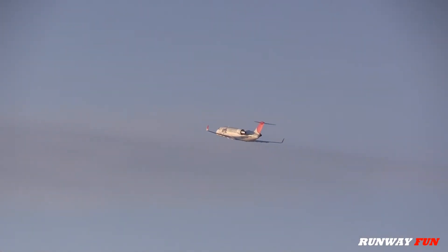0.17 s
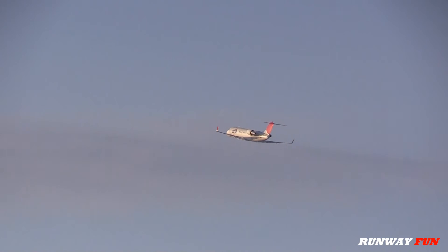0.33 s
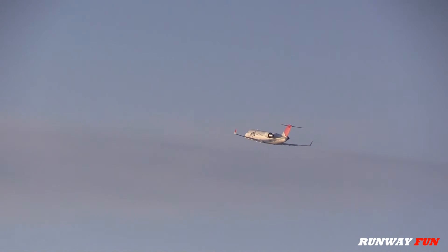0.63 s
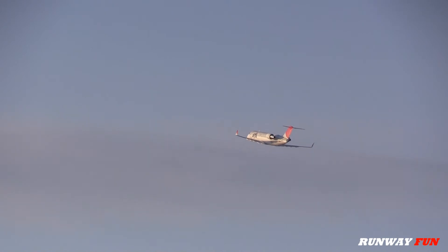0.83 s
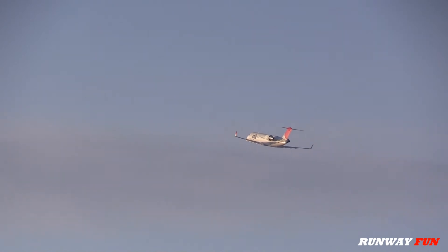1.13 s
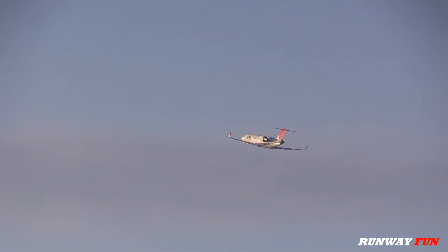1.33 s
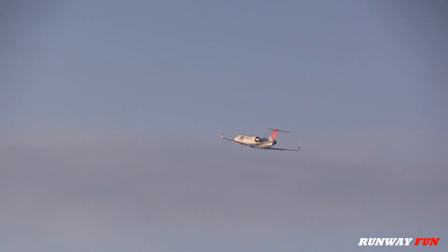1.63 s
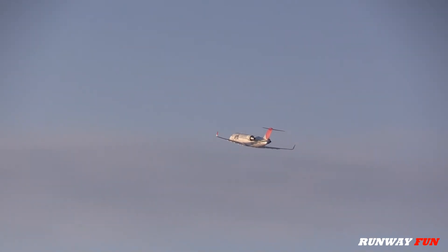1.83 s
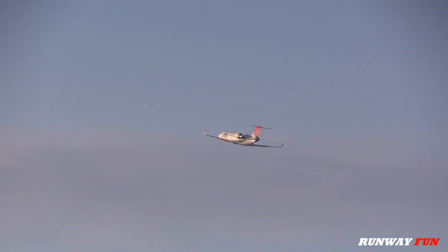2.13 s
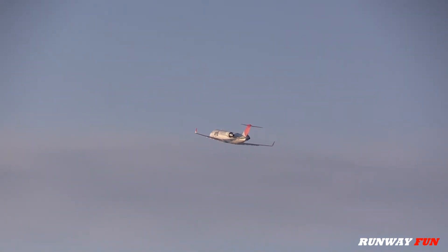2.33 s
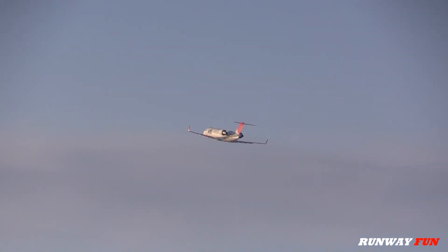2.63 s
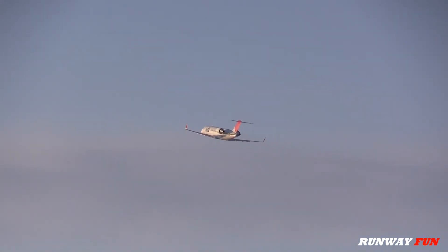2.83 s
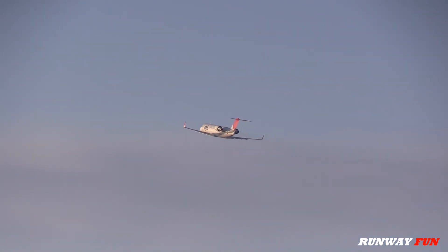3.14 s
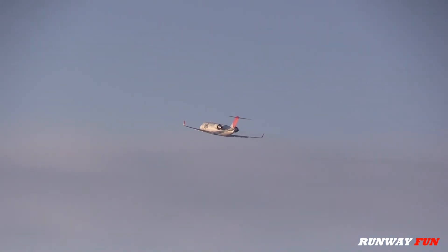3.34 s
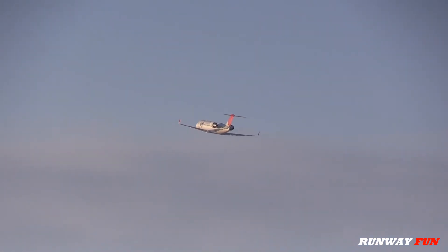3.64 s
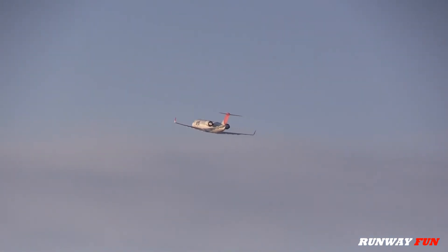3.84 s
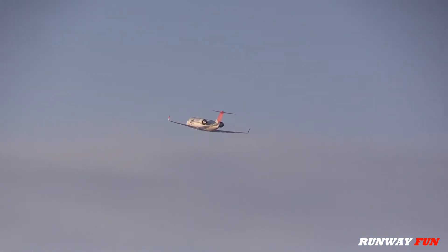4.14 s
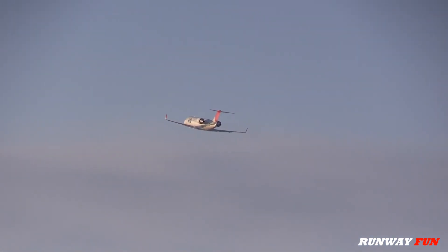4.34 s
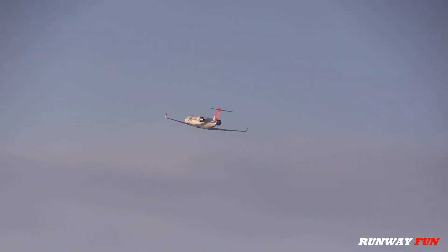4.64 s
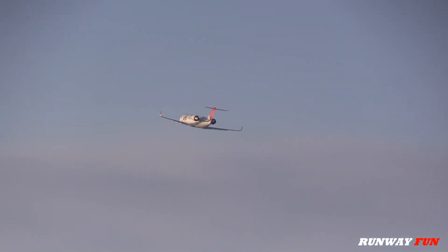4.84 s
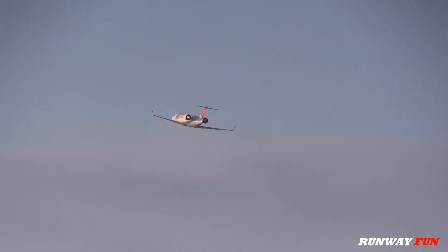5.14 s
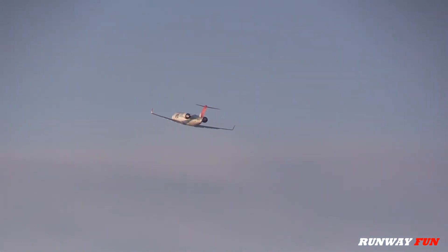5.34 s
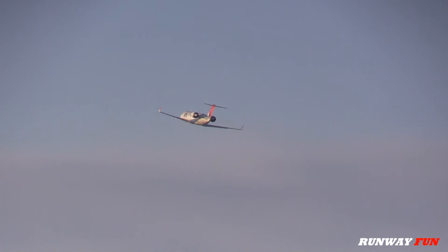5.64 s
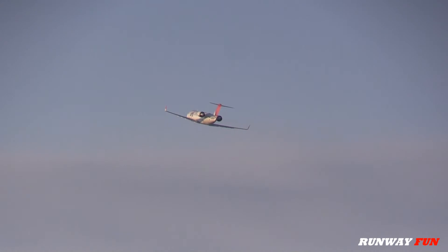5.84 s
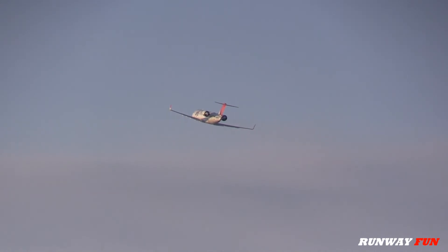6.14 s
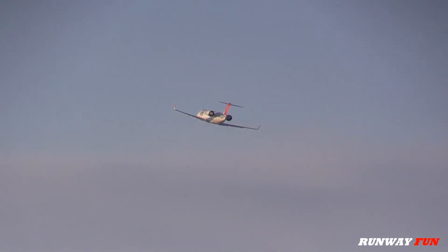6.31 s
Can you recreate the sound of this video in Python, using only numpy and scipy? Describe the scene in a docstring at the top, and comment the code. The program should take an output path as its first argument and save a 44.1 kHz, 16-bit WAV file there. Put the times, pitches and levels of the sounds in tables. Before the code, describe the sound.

Distant rumble of a small departing jet gradually weakens and dulls, with a faint buzz, thin hiss and occasional soft plastic clicks close by.

```python
"""A small twin jet climbs away, heard from far off beside a camera on a tripod.
From the start the turbulent exhaust roars, wavering in the air; the fans add a faint buzz and whine,
and close by the camera's motor hums in a thin hiss. From 0.2 s to just after 5 s its controls click
now and then, ringing the housing. The whine flares twice in the first two seconds, the buzz fades
and returns around the middle, and by the end the receding roar is weaker and duller."""
import sys
import numpy as np
from scipy import signal
from scipy.fft import rfft, irfft
from scipy.io import wavfile

SR = 44100
rng = np.random.default_rng(int(sys.argv[2]) if len(sys.argv) > 2 else 0)


def int16_out(signal):
    """Quantize to a 16-bit WAV file."""
    q = np.round(np.clip(np.atleast_2d(signal).T, -1, 1) * 32767)
    wavfile.write(sys.argv[1], SR, q.astype(np.int16))


N = 285327
TIME = np.arange(N) / SR
FREQ = np.maximum(np.fft.rfftfreq(N, 1 / SR), 1)
OPPOSED = np.array([[1], [-1]])  # antiphase between left and right

# exhaust roar: (frequency [Hz], relative spectral density [dB])
ROAR_SPECTRUM = [(20, -47), (42, -13), (55, -19.5), (68, -2.5), (90, -6), (106, 2.5), (165, 1), (200, -5.5),
                 (290, -7.5), (400, -13.5), (540, -17), (760, -22.5), (1300, -36.5), (1850, -49.5),
                 (2550, -62.5), (6000, -85.5)]
# share of the roar scattered by the surroundings: (frequency [Hz], side minus mid level [dB])
ROAR_SCATTER = [(30, -19), (70, -31), (140, -27), (280, -15), (480, -10), (900, -3), (2500, -5.5)]
# the roar swells or sinks: (centre time [s], duration [s], rumble gain [dB], rush gain [dB])
ROAR_SWELLS = [(-0.013, 0.14, 10, 1.5), (1.733, 0.57, -3.5, -2.5), (2.427, 0.47, 0, -0.5),
               (2.802, 2.4, 0, -2), (3.485, 0.13, 8, -0.5), (4.675, 0.13, 7, -2), (4.948, 0.53, -2.5, 1),
               (6.147, 0.54, 3, 0.5)]
# buzz of the fans' uneven blade shocks:
# (shaft harmonic [number], engine [-1 or 1], level from beside [dB], level from behind [dB])
BUZZ_HARMONICS = [(4, 1, -14, -7.5), (5, -1, -1.5, -8), (6, 1, -6.5, -6.5), (7, -1, -4.5, -4.5),
                  (8, 1, -12.5, -5), (9, 1, -11.5, -12), (10, 1, -25, -20.5), (11, 1, -12.5, -18),
                  (12, 1, -18, -17.5)]
# the buzz fades for a while: (centre time [s], duration [s], gain [dB])
BUZZ_DIPS = [(3.345, 2.8, -5)]
# the whine flares up: (start time [s], duration [s], gain [dB])
WHINE_BOOSTS = [(.56, .33, 9.5), (1.26, 0.48, 7)]
# hum of the camera's motor: (frequency [Hz], level [dB])
MOTOR_TONES = [(574.3, -51), (587.7, -55.5), (1148.6, -72)]
# microphone hiss: (frequency [Hz], relative spectral density [dB])
HISS_SPECTRUM = [(200, 2), (3000, 2), (5000, 1), (8000, -.3), (12000, -1.3), (15500, -1.3)]
# clicks of the camera's controls: (time [s], level [dB], contact softness [0-1])
CONTROL_CLICKS = [(0.1898, -41.5, .1), (0.8885, -42.5, .4), (1.0675, -51, .6), (1.2411, -43.5, .35),
                  (2.3028, -41.5, .1), (3.7812, -40.5, .05), (4.7697, -59, .4), (5.124, -43, .1)]
# normal modes of the plastic housing: (frequency [Hz], level [dB], 60 dB decay time [s])
HOUSING_MODES = [(1280, -2, .06), (1660, -6, .06), (1830, -8, .06), (2070, -11, .075), (2133, -6, .075),
                 (2182, -10, .08), (2330, -16, .06), (2490, -15, .06), (2600, -14, .06), (2940, -13, .06),
                 (3350, -17, .06), (3850, -20, .06), (4420, -11, .04), (4790, -16, .04), (4930, -16, .04),
                 (5140, -12, .04), (7140, -24, .06)]
# its dense weaker modes: (frequency [Hz], relative spectral density [dB])
CRACK_SPECTRUM = [(500, -15), (1200, 0), (2100, -8), (3500, -17), (4800, -9), (5800, -16), (7200, -14),
                  (9000, -19), (12000, -19), (15500, -27)]


def undb(db):
    """Amplitude ratio of a level in decibels."""
    return 10 ** (np.asarray(db) / 20)


def unit(x):
    """Normalisation to rms 1."""
    return x / np.sqrt(np.mean(x ** 2))


def colour(points):
    """Spectral envelope: gain interpolated over log frequency from (Hz, dB) points."""
    hz, db = np.transpose(points)
    return undb(np.interp(np.log(FREQ), np.log(hz), db))


def noise(gain):
    """Linear filtering: white noise weighted by a gain at every frequency."""
    return irfft(rfft(rng.standard_normal(N)) * gain, N)


def walk(rate_hz):
    """Low-pass random fluctuation of rms 1 with a bandwidth of about rate_hz."""
    return unit(noise(np.exp(-(np.fft.rfftfreq(N, 1 / SR) / rate_hz) ** 2)))


def swell(centre, duration):
    """Raised-cosine envelope, from 0 to 1 and back."""
    return np.cos(np.pi * np.clip((TIME - centre) / duration, -.5, .5)) ** 2


def flare(start, duration, edge_s=0.033):
    """Trapezoidal envelope: quick attack, hold, quick release."""
    return np.clip(np.minimum(TIME - start, start + duration - TIME) / edge_s, 0, 1)


def flight(speed_m_s=75, nearest_m=301.2, past_nearest_m=477.4):
    """Spherical spreading along a straight path: gain in dB since the start, and the jet's aspect."""
    along = past_nearest_m + speed_m_s * TIME
    distance = np.hypot(along, nearest_m)
    spreading_db = 20 * np.log10(distance[0] / distance)
    cosine = along / distance
    behind = (cosine - cosine[0]) / (cosine[-1] - cosine[0])  # 0 "beside" at first, 1 "behind" at last
    return spreading_db, behind


def roar_levels(spreading_db, behind):
    """Directivity: the exhaust throws its lows backwards; rumble and rush also swell on their own."""
    roar_db = np.interp(behind, (0, 1), (-23.5, -25.5)) + spreading_db
    rumble_db = np.interp(behind, (0, 1), (-3.5, -0.7))
    rush_db = np.interp(behind, (0, 1), (2.5, -0.8))
    for centre, duration, deep_db, high_db in ROAR_SWELLS:
        rumble_db += deep_db * swell(centre, duration)
        rush_db += high_db * swell(centre, duration)
    return roar_db, rumble_db, rush_db


def exhaust_roar(roar_db, rumble_db, rush_db, waver_db=0.54, rumble_hz=170, rush_hz=750):
    """Turbulent mixing radiates broadband noise; each half octave wavers on its way through the air."""
    shape = colour(ROAR_SPECTRUM)
    direct = noise(shape)
    scattered = noise(shape * colour(ROAR_SCATTER))
    spectrum = rfft(unit(direct + OPPOSED * scattered))
    half_octaves = 2 * np.log2(FREQ)
    roar = 0
    for band in range(8, 26):
        hz = 2 ** (band / 2)
        rumble_share = 1 / (1 + (hz / rumble_hz) ** 6)
        rush_share = 1 / (1 + (rush_hz / hz) ** 4)
        db = roar_db + rumble_share * rumble_db + rush_share * rush_db + waver_db * walk(rate_hz=8)
        triangle = np.maximum(1 - abs(half_octaves - band), 0)
        roar += undb(db) * irfft(spectrum * triangle, N)
    return roar


def far_tone(hz, scatter=0.66, fade_hz=6, width=0.36):
    """Multipath interference: a steady tone adds to copies scattered by turbulent air, and wavers."""
    steady = np.exp(2j * np.pi * rng.random())
    scattered = scatter * (walk(fade_hz) + 1j * walk(fade_hz))
    side = width * OPPOSED * walk(fade_hz)
    carrier = np.exp(2j * np.pi * np.cumsum(hz) / SR)
    return unit(np.real((steady + scattered + side) * carrier))


def fan_buzz(shaft_hz, detune_hz, spreading_db, behind, level_db=-41.5):
    """Uneven blade shocks repeat each turn, giving harmonics of two slightly different shaft rates."""
    dip_db = sum(db * swell(centre, duration) for centre, duration, db in BUZZ_DIPS)
    buzz = 0
    for harmonic, engine, beside_db, behind_db in BUZZ_HARMONICS:
        directivity_db = beside_db + behind * (behind_db - beside_db)
        buzz += undb(directivity_db) * far_tone(harmonic * (shaft_hz + engine * detune_hz))
    return undb(level_db + spreading_db + dip_db) * buzz


def fan_whine(shaft_hz, spreading_db, behind, blades=28, level_db=-80.5, shadow_db=-8):
    """One fan radiates its blade-passing frequency, shadowed from behind; the tone flares twice."""
    flare_db = sum(db * flare(start, duration) for start, duration, db in WHINE_BOOSTS)
    whine = far_tone(blades * shaft_hz, scatter=0.31, fade_hz=17)
    return undb(level_db + spreading_db + shadow_db * behind + flare_db) * whine


def motor_hum(flutter_hz=0.27):
    """Structure-borne vibration: the camera's motor rocks the two microphone capsules in antiphase."""
    hum = 0
    for hz, db in MOTOR_TONES:
        phase = 2 * np.pi * np.cumsum(hz + flutter_hz * walk(rate_hz=3)) / SR
        hum += undb(db) * unit(np.sin(phase))
    return OPPOSED * hum


def microphone_hiss(level_db=-68.4):
    """Self-noise: each capsule has its own hiss, uncorrelated with the other's."""
    return undb(level_db) * np.array([unit(noise(colour(HISS_SPECTRUM))) for _ in range(2)])


def control_clicks(width=0.36, crack_db=-3.8, crack_t60_s=.065):
    """Impulse response: each snap of a catch excites the same housing modes, with a varying crack."""
    t = TIME[:SR // 5]
    ring = 0
    for hz, db, t60 in HOUSING_MODES:
        phase = width * OPPOSED * rng.standard_normal()
        rise = 1 - np.exp(-t * hz / 2)  # low modes take longer to build up
        ring += rise * undb(db - 60 * t / t60) * np.sin(2 * np.pi * hz * t + phase)
    shape = colour(CRACK_SPECTRUM)
    dense_modes = unit(noise(shape) + width * OPPOSED * noise(shape))
    clicks = np.zeros((2, N))
    for start, db, softness in CONTROL_CLICKS:
        span = slice(int(start * SR), int(start * SR) + len(t))
        crack = undb(crack_db - 60 * t / crack_t60_s) * dense_modes[:, span]
        snap = signal.lfilter([1 - softness], [1, -softness], ring + crack)  # softer sounds duller
        clicks[:, span] += undb(db) * snap
    return clicks


def scene(right_db=1.1, detune_hz=.21):
    """Superposition of far jet and near camera; all but the clicks are a little stronger on the right."""
    spreading_db, behind = flight()
    shaft_hz = 86.45 - 1.5 * behind  # Doppler drop as the jet turns tail on
    roar = exhaust_roar(*roar_levels(spreading_db, behind))
    buzz = fan_buzz(shaft_hz, detune_hz, spreading_db, behind)
    whine = fan_whine(shaft_hz + detune_hz, spreading_db, behind)
    balance = undb(-OPPOSED * right_db / 2)
    return balance * (roar + buzz + whine + motor_hum() + microphone_hiss()) + control_clicks()


def record(dry, cutoff_hz=15800):
    """Band limiting: a steep elliptic low-pass removes the highest treble."""
    return signal.sosfilt(signal.ellip(10, .1, 80, cutoff_hz, fs=SR, output="sos"), dry)


dry = scene()
out = record(dry)
int16_out(out)
```